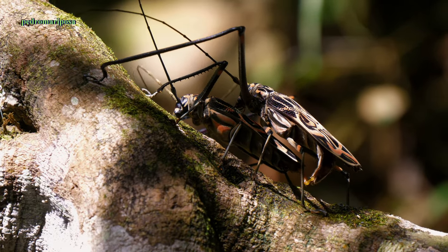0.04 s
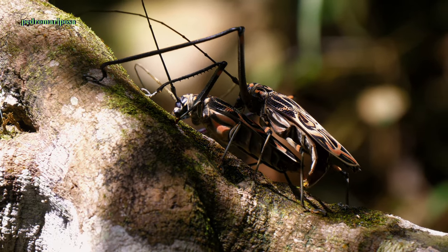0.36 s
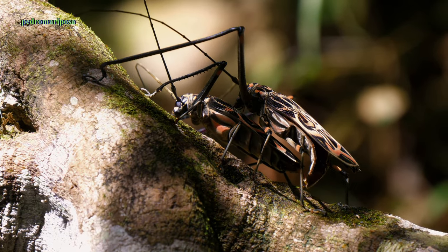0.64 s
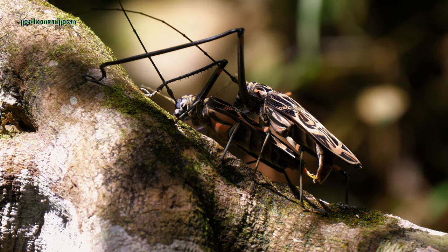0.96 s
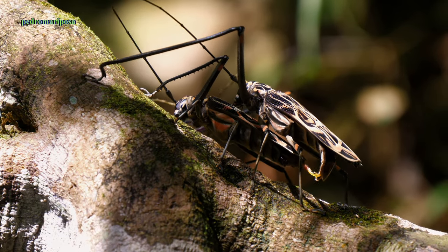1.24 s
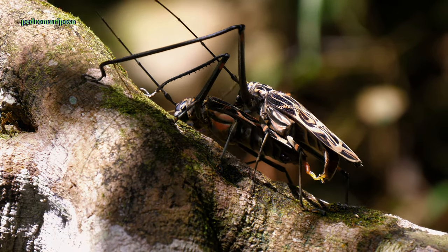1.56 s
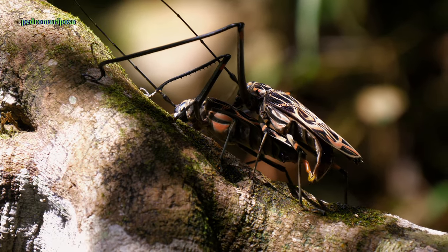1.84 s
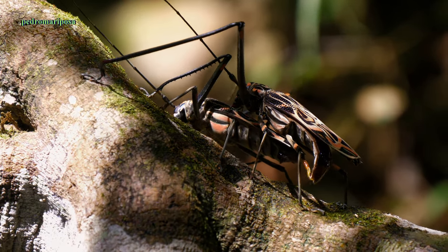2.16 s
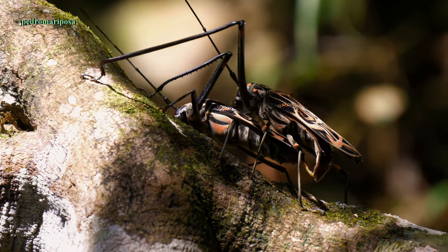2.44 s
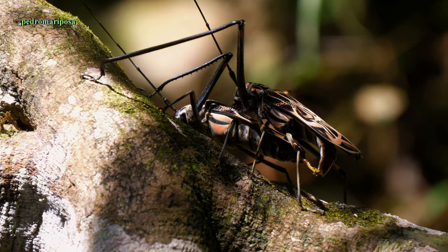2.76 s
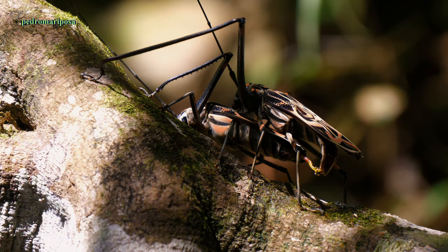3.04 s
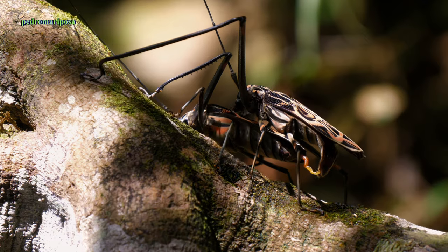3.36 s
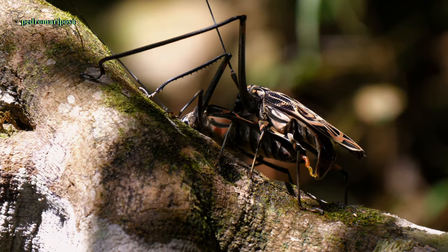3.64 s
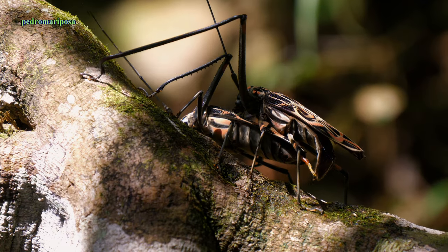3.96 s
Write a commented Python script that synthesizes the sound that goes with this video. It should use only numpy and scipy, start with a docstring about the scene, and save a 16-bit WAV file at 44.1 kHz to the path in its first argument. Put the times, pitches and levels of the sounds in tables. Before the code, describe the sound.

Close, thin rasping from a beetle on a forest tree: four bursts of sharp chirps among dry, squeaky scrapes, then only softer scrapes. Insects hiss all around, turning brighter in the second half. The sound has no bass.

```python
"""Soft, dry scrapes and quick runs of sharp chirps sound over the hiss of a forest.
A large beetle is rasping on a tree trunk: each stroke rubs its file, a row of tiny teeth.
Some strokes squeak, and in four the file catches and rings the shell, making the chirps.
Behind it insects hiss and buzz, and a very high chorus joins past the middle.
The microphone has a steep bass cut."""
import sys
import numpy as np
from scipy import signal
from scipy.fft import rfft, irfft, next_fast_len
from scipy.io import wavfile
from scipy.ndimage import uniform_filter1d

SR = 44100
rng = np.random.default_rng(int(sys.argv[2]) if len(sys.argv) > 2 else 0)


def waveform_to_disk(signal):
    """Save audio, clipped to [-1, 1], as 16-bit WAV at the path in sys.argv[1]."""
    frames = np.transpose(np.atleast_2d(signal))
    scaled = np.clip(frames, -1, 1) * 32767
    samples = np.round(scaled).astype(np.int16)
    wavfile.write(sys.argv[1], SR, samples)


N = 176400
T = np.arange(N) / SR
# Noise is shaped on a grid of short time frames (rows) and frequencies (columns).
FRAME_T = np.arange(N // 128 + 5)[:, None] * 128 / SR
HZ = np.fft.rfftfreq(512, 1 / SR)


def amp(db):
    """Turns decibels into a gain to multiply by."""
    return 10 ** (np.asarray(db) / 20)


def unit(x):
    """Scales a signal to an average size (rms) of 1."""
    return x / np.sqrt(np.mean(x ** 2) + 1e-20)


def level(points):
    """Gain over time, from a table of t/s, level/dB."""
    return amp(np.interp(T, *np.transpose(points)))


def tone(points, hz=HZ):
    """Gain at each frequency, from a table of f/Hz, level/dB."""
    f, db = np.transpose(points)
    return amp(np.interp(np.log(hz + 1), np.log(f + 1), db))


def colour(x, points):
    """Filters a sound by a table of f/Hz, level/dB."""
    size = next_fast_len(x.shape[-1] + 2048)
    gain = tone(points, np.fft.rfftfreq(size, 1 / SR))
    return irfft(rfft(x, size) * gain, size)[..., :x.shape[-1]]


def hiss(shape, alike, left_db, patchy_db):
    """Shaped stereo noise with louder and softer patches; alike=1 gives both ears the same noise."""
    a, b, c, d, patches = rng.standard_normal((len(FRAME_T), len(HZ), 5)).T.transpose(0, 2, 1)
    patches = uniform_filter1d(patches, size=16, axis=0)
    patches = unit(uniform_filter1d(patches, size=2, axis=1))
    left = a + 1j * b
    right = alike * left + np.sqrt(1 - alike ** 2) * (c + 1j * d)
    grid = np.array([left, right]) * shape * amp(patchy_db * patches)
    _, noise = signal.istft(grid, nperseg=512, noverlap=384, time_axis=-2, freq_axis=-1)
    balance = amp([[left_db / 2], [-left_db / 2]])
    return noise[:, :N] * balance / np.sqrt(len(HZ) / 6)


def swell(t, rise, fall):
    """Loudness of a stroke that gathers speed until t = 0, then slows."""
    return np.exp(-abs(t / np.where(t < 0, rise, fall)) ** 1.3)


# Tone of the forest hiss: f/Hz, level/dB
FOREST_TONE = [(1400, -3), (1800, 0), (3000, 0.5), (3800, -2), (4400, -7), (5000, -5.5), (5700, -5),
               (6400, -9.5), (8300, -9.5), (9800, -5.5), (12000, -4.5), (14000, -11.5), (16000, -16.5)]
# Loudness of the forest hiss: t/s, level/dB
FOREST_LOUDNESS = [(0, -47), (.35, -47), (1.0, -48), (1.4, -46.5), (1.85, -48.5), (2.15, -45.5),
                   (2.55, -47.5), (3.0, -49), (3.45, -48.5), (4, -48)]

def forest_hiss():
    """Many insects blur into a steady hiss, its lows near the centre and its highs spread wide."""
    shape = unit(tone(FOREST_TONE))
    low_share = 1 / (1 + (HZ / 5600) ** 4)
    lows = hiss(shape * np.sqrt(low_share), alike=0.71, left_db=1.5, patchy_db=2.5)
    highs = hiss(shape * np.sqrt(1 - low_share), alike=-0.05, left_db=2.3, patchy_db=2.0)
    return level(FOREST_LOUDNESS) * (lows + highs)


# Loudness of the crickets: t/s, level/dB
CRICKET_LOUDNESS = [(0, -69), (.3, -59), (.43, -66.5), (.55, -62.5), (1.05, -59.5), (1.38, -63.5),
                    (1.9, -58.5), (2.3, -69.5), (2.48, -59.5), (2.62, -72), (2.87, -72), (3.03, -59),
                    (3.3, -61), (3.47, -71.5), (3.6, -64), (3.8, -58.5), (4, -63.5)]

def crickets(pitch_hz=5963, width_hz=140, sag_hz_per_s=48):
    """Crickets merge into one thin band of noise that slowly sinks in pitch."""
    centre_hz = pitch_hz - sag_hz_per_s * FRAME_T
    band = unit(np.exp(-((HZ - centre_hz) / width_hz) ** 2))
    return level(CRICKET_LOUDNESS) * hiss(band, alike=0.13, left_db=1.5, patchy_db=3.5)


# Loudness of the insect buzz: t/s, level/dB
BUZZ_LOUDNESS = [(0, -59.5), (.5, -55.5), (1.1, -56), (1.5, -65), (2.2, -60), (2.7, -69.5), (4, -68.5)]

def insect_buzz(pitch_hz=3923, width_hz=510):
    """Other insects make a lower, broader band of noise."""
    band = unit(np.exp(-((HZ - pitch_hz) / width_hz) ** 2))
    return level(BUZZ_LOUDNESS) * hiss(band, alike=0.27, left_db=0.5, patchy_db=3.5)


# Tone of the high chorus: f/Hz, level/dB
CHORUS_TONE = [(8500, -28.5), (10000, -6.5), (11000, 1), (11800, 1), (13200, -3), (15000, -6.5),
               (16000, -11)]

def high_chorus(start_s=2.58, rise_s=0.025, level_db=-49.5):
    """A very high hiss of insects starts suddenly and stays."""
    fade_in = np.clip((T - start_s) / rise_s, 0, 1)
    chorus = hiss(unit(tone(CHORUS_TONE)), alike=-0.13, left_db=2.5, patchy_db=2.5)
    return amp(level_db) * fade_in * chorus


def bark_echoes(x, echo_db=-13, fade_s=0.11, delay_s=0.003):
    """Adds short, scattered echoes from the trunk and leaves."""
    t = T[:SR // 4]
    tail = rng.standard_normal((2, len(t))) * amp(-60 * t / fade_s) * (t > delay_s)
    tail /= np.linalg.norm(tail[0])
    return x + amp(echo_db) * signal.fftconvolve(x[None], tail, axes=1)[:, :N]


# One row per squeak, timed at its loudest: t/s, half length/s, f/Hz, level/dB
SQUEAK_EVENTS = [(0.18, 0.077, 2960, -49.5), (0.482, 0.027, 3000, -52.5), (0.771, 0.047, 2940, -44.5),
                 (1.143, 0.045, 2930, -51), (1.503, 0.0089, 3045, -44.5), (1.642, 0.029, 2980, -47),
                 (1.953, 0.026, 3040, -52), (2.254, 0.043, 2976, -47), (3.102, 0.052, 3140, -54),
                 (3.701, 0.0081, 1940, -47.5), (3.784, .04, 3300, -47)]

def squeaks(width_hz=440, glide_hz_per_s=1300):
    """Where the file rubs more evenly, a narrow band of noise rings and slides upward."""
    shape = 0
    for at, half_length, hz, db in SQUEAK_EVENTS:
        t = FRAME_T - at
        centre_hz = hz + glide_hz_per_s * np.clip(t, -0.2, 0.2)
        peak = 1 / (1 + ((HZ - centre_hz) / (width_hz / 2)) ** 2)
        shape += amp(db) * swell(t, half_length, half_length) * unit(peak ** 2)
    return hiss(shape, alike=0.92, left_db=0.5, patchy_db=1.5)


# One row per stroke, timed at its loudest: t/s, rise/s, fall/s, body level/dB, fizz level/dB
FILE_STROKES = [(.097, 0.034, 0.033, -39.5, -44), (.21, 0.077, 0.092, -46, -46.5),
                (0.484, 0.016, 0.033, -50.5, -50), (0.623, 0.057, 0.04, -40, -44.5),
                (.795, 0.077, 0.099, -48, -44.5), (1.195, 0.062, 0.052, -41.5, -44.5),
                (1.48, 0.061, 0.07, -51.5, -51.5), (1.664, 0.057, 0.071, -47, -45.5),
                (1.965, 0.038, 0.044, -52, -56), (2.035, 0.034, 0.037, -42, -45.5),
                (2.272, 0.067, 0.074, -45.5, -47), (3.095, .065, 0.073, -45.5, -50),
                (3.18, 0.033, 0.1, -50.5, -50.5), (3.808, 0.063, 0.12, -44, -44.5)]
# Tone of the body, the lower part of a scrape: f/Hz, level/dB
BODY_TONE = [(1400, -19.5), (2100, -3.5), (2500, -1), (3300, 0.5), (4200, 2.5), (5000, -0.5), (5850, 0),
             (6400, -9), (7600, -7), (8600, -13.5), (11000, -23.5), (16000, -39)]
# Tone of the fizz, the bright top of a scrape: f/Hz, level/dB
FIZZ_TONE = [(4000, -23.5), (7000, -5), (9000, -7.5), (10300, 0), (11500, -3), (12400, 2), (13700, -3),
             (15200, -7.5), (16000, -7.5)]

def scrapes(fizz_lag_s=0.0065, grain_db=0.43):
    """Tiny teeth rub and make grainy noise: a body, with a fizz just behind it."""
    body_gain = fizz_gain = 0
    for at, rise, fall, body_db, fizz_db in FILE_STROKES:
        body_gain += amp(body_db) * swell(T - at, rise, fall)
        fizz_gain += amp(fizz_db) * swell(T - at - fizz_lag_s, rise, fall)
    flutter = unit(uniform_filter1d(rng.standard_normal(N), size=60))
    grain = unit(amp(grain_db * flutter))
    body = hiss(unit(tone(BODY_TONE)), alike=0.62, left_db=0.1, patchy_db=2.5)
    fizz = hiss(unit(tone(FIZZ_TONE)), alike=-0.28, left_db=2.0, patchy_db=3.5)
    return grain * (body_gain * body + fizz_gain * fizz)


# Moments when the file catches: t/s, level/dB
FILE_CATCHES = [(0.0676, -28.5), (.0795, -23.5), (0.0824, -28.5), (0.0863, -24.5), (0.0947, -23.5),
                (.0968, -42), (0.1023, -25), (0.5863, -24.5), (.603, -21.5), (0.61, -29.5), (.6162, -23.5),
                (.6175, -23), (0.6237, -22.5), (1.1712, -35), (1.1876, -22.5), (1.1906, -26.5),
                (1.194, -23), (1.1972, -38), (1.2003, -28), (2.0138, -28), (2.0167, -26.5), (2.0216, -26),
                (2.0247, -41), (2.0288, -25), (2.0307, -28), (2.037, -24.5)]
# How strongly the shell rings at each pitch: f/Hz, level/dB
SHELL_TONE = [(1500, -12), (2000, -5), (2330, -12), (2780, 6), (3350, -11), (4150, 2.5), (4650, 1.5),
              (4970, -4), (5400, 1.5), (5800, 1), (6300, -14), (7800, -12.5), (8500, -27.5), (10000, -17),
              (11500, -26.5), (12500, -16), (13800, -32)]

def catches(teeth_per_s=4890, slowing=0.032, jitter=0.15, width_s=0.00074, snag_db=2.5, boost_db=0.3):
    """Each catch drags over a few uneven teeth, slowing as it goes, and rings the shell."""
    out = np.zeros(N)
    t = np.arange(-400, 400) / SR
    tooth = np.arange(-10, 11)
    for at, db in FILE_CATCHES:
        uneven = jitter * rng.standard_normal(len(tooth))
        tooth_times = (tooth + slowing * tooth ** 2 + uneven) / teeth_per_s
        force = np.exp(-(tooth_times / width_s) ** 2 / 2)
        force[tooth == 0] *= amp(snag_db)  # the middle tooth snags harder
        clicks = force @ np.sinc((t - tooth_times[:, None]) * SR)  # one click per tooth
        clicks = clicks - uniform_filter1d(clicks, size=28)  # takes out the lows
        chirp = colour(clicks, SHELL_TONE)
        loudest = np.sqrt(uniform_filter1d(chirp ** 2, size=44).max())
        start = round(at * SR) - len(t) // 2
        out[start:start + len(t)] += amp(db + boost_db) * chirp / loudest
    return out


def scene():
    """The beetle close by, the forest around it."""
    beetle = bark_echoes(catches()) + scrapes() + squeaks()
    return beetle + forest_hiss() + crickets() + insect_buzz() + high_chorus()


# How far the microphone turns down each pitch: f/Hz, level/dB
MIC_BASS_CUT = [(20, -59), (350, -62), (550, -48), (800, -38), (1150, -28), (1400, -28.5), (1500, -15),
                (1620, -8), (1750, -5)]

def record(dry, top_hz=15830):
    """The microphone cuts the bass steeply and drops the very highest treble."""
    treble_cut = signal.firwin(511, top_hz, window=("kaiser", 9), fs=SR)
    return signal.oaconvolve(colour(dry, MIC_BASS_CUT), treble_cut[None], "same")


dry = scene()
out = record(dry)
waveform_to_disk(out)
```